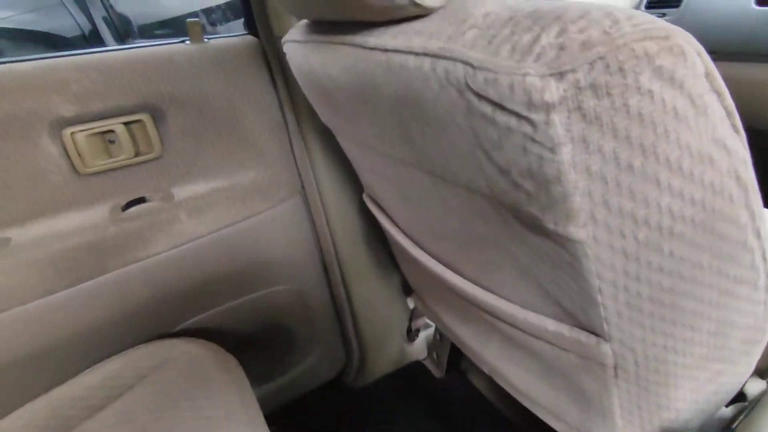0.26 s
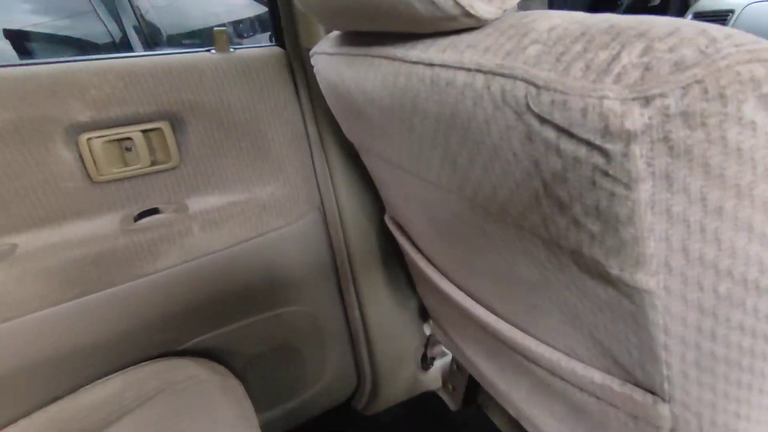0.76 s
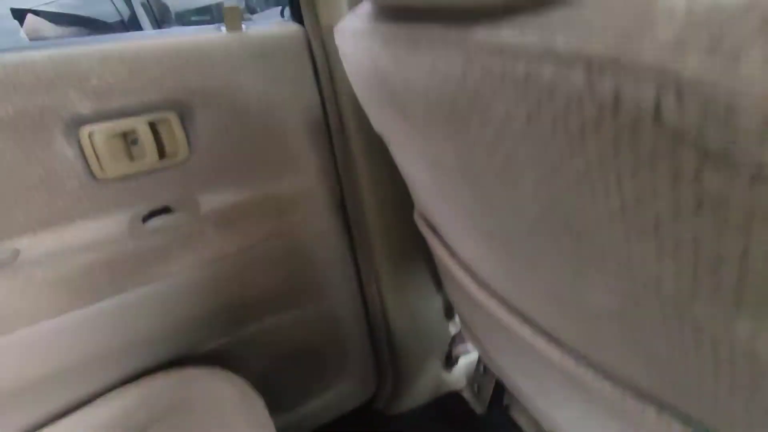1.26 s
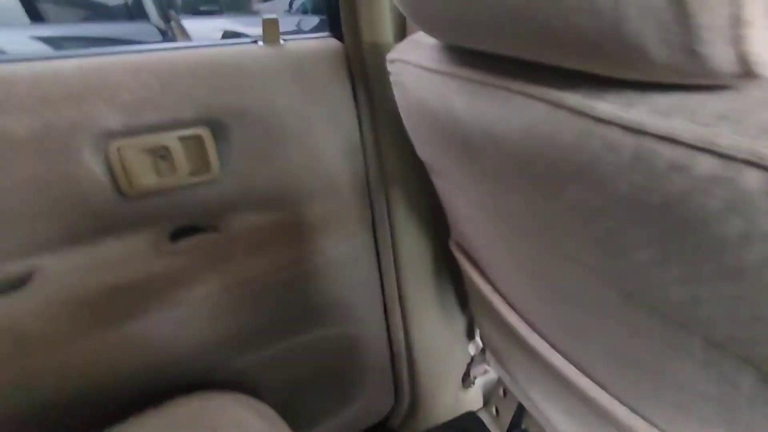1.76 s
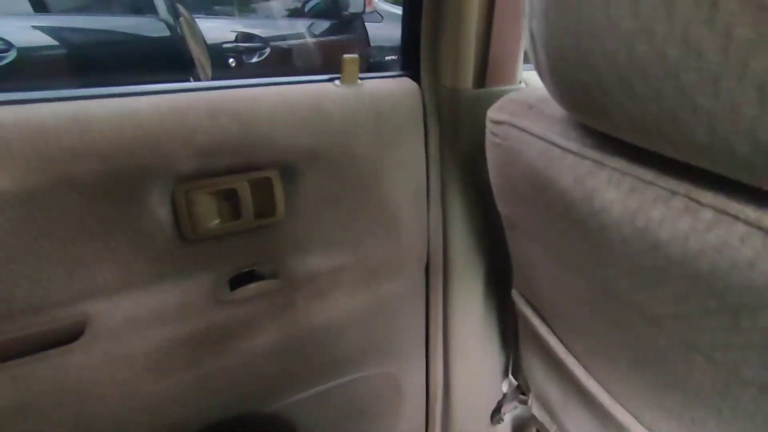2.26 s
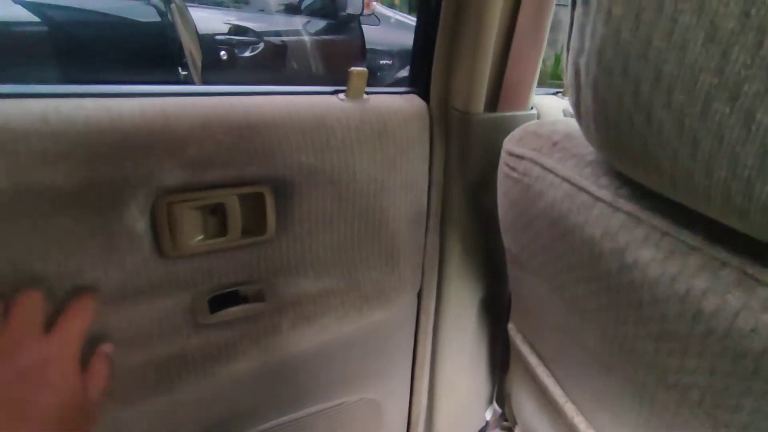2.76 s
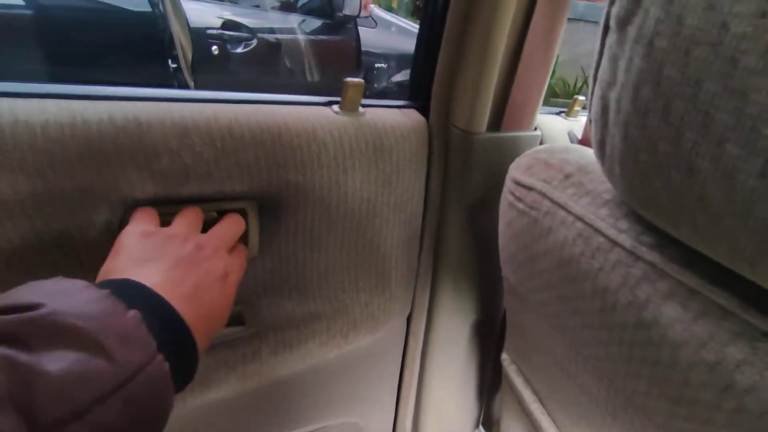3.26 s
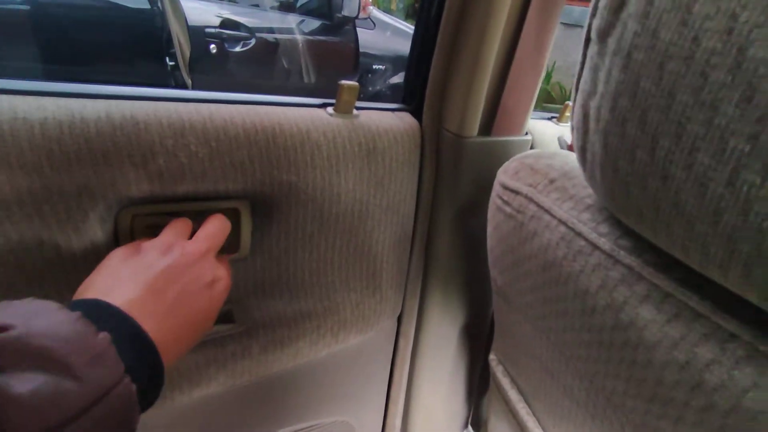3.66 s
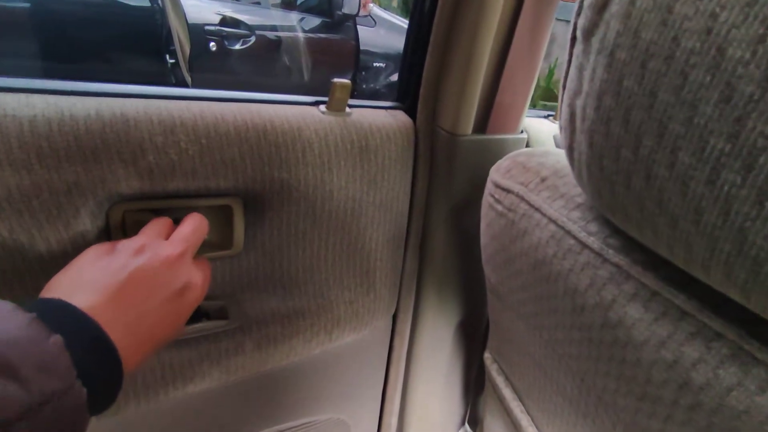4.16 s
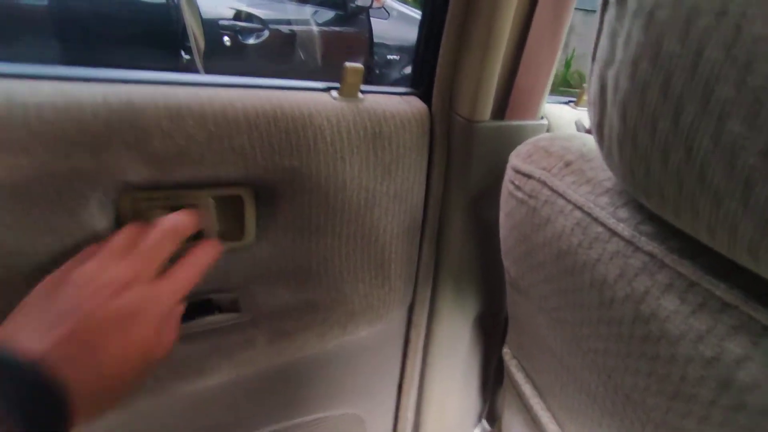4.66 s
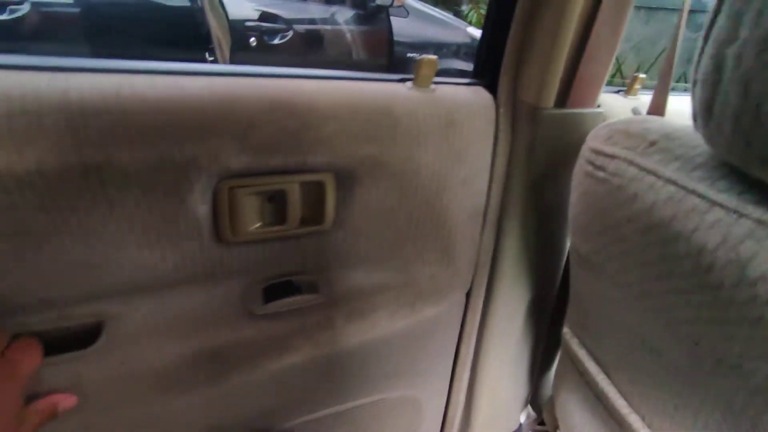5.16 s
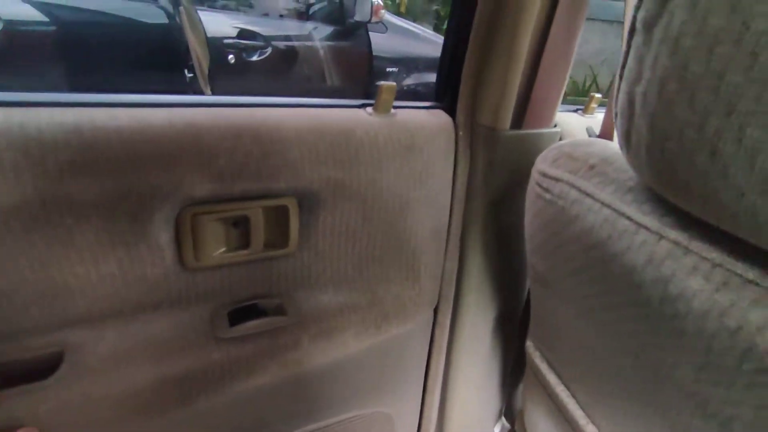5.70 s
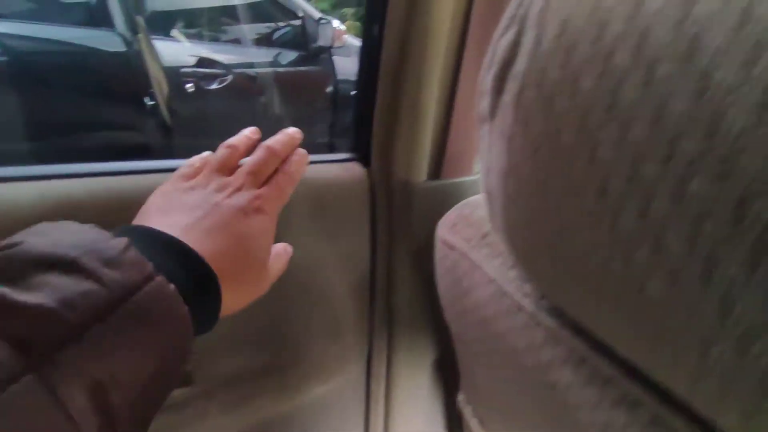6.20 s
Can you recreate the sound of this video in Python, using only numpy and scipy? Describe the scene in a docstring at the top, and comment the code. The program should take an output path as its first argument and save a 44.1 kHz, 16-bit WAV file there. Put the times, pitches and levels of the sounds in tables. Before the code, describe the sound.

The space is a small, padded car cabin, heard close up, with deep uneven rumble, very faint hiss and a low engine hum that emerges after about 1 s and slowly sinks in pitch. At 0.1 s there is a small plastic click and knock amid soft jacket rustle. Dull seat bumps follow; near 1.3 s a hollow tock and slight metal clink, and around 2.0 s a cluster of bright ticks and jingles, then a low bump at 2.3 s. From 3.1 to 4.1 s fingers fiddle with the plastic handle in light, irregular clicks and scrapes. At 4.2 s a sharp click starts a dry creak of about 0.2 s with tiny springy pings; at 4.6 s the lever snaps. Around 5.5 s the door unlatches with a soft, deep thump. At 5.85 s it shuts with the loudest sound, a hard latch clunk and a bassy boom, fading into rumble and slight rustle.

```python
"""A plastic door handle in a parked car is worked: filtered noise bursts click, and stick-slip pulses creak.
Its spring pings in chirps; the door unlatches with a soft thump and is pulled shut with a heavy clunk,
made of decaying noise and shell modes, while single pressure swings and low modes boom in the cabin.
Someone shifts on the back seat: grainy noise rustles, damped modes knock and small metal bits jingle.
Behind it an engine hums as a sum of wandering sine orders, over low rumble and faint hiss."""
import sys
import numpy as np
from scipy import signal
from scipy.fft import rfft, irfft, next_fast_len
from scipy.io import wavfile
from scipy.ndimage import map_coordinates

SR = 44100
rng = np.random.default_rng(int(sys.argv[2]) if len(sys.argv) > 2 else 0)


def persist_wave(psi):
    """Save psi, clipped to +-1, as 16-bit WAV."""
    counts = np.round(np.clip(psi, -1, 1) * 32767).astype(np.int16)
    wavfile.write(sys.argv[1], SR, np.atleast_2d(counts).T)


N = 283871
TIME = np.arange(N) / SR
TOP_HZ = 14600  # upper band limit

# All levels are relative settings: later gains, pans and cabin tail still act on them.
# Plastic handle, trim and latch contacts. Each row: start in seconds, level in dB, click note in Hz,
# clack in dB, knock in dB.
CONTACTS = [(0.0908, -38.5, 2720, -4.5, -18), (0.0942, -33, 2750, -9, 3.5), (0.9423, -45, 3930, -17, -6),
            (1.4096, -45, 3020, -8.5, -15), (1.9548, -44, 3950, -12, -18), (1.9633, -44, 3340, -2, -9),
            (1.9709, -39, 5750, -11.5, -2), (1.9936, -37, 5270, -3, -10), (2.2502, -37, 3340, -12.5, -16),
            (3.1936, -51.5, 3733, -15, 3), (3.229, -51, 3370, -12, 4), (3.2946, -47.5, 2960, -20, -23),
            (3.3003, -36.5, 4600, -13, -10.5), (3.3565, -50.5, 4770, -2, 2), (3.4183, -57.5, 2640, 3.5, 4),
            (3.4825, -44.5, 5250, -10.5, -20), (3.709, -48.5, 3730, -4, -1), (3.785, -53, 4000, -9, 3),
            (3.8336, -49.5, 3800, -7.5, -18), (3.966, -37, 3680, -16, -14), (3.9974, -49, 3810, -0.5, -20),
            (4.0426, -48.5, 3280, 3.5, -4), (4.1718, -58, 3537, -3, -15), (4.2229, -32, 5130, -6, -32),
            (4.2544, -38.5, 4060, -6.5, -29), (4.5165, -45.5, 4160, -8, -6),
            (4.5614, -48.5, 3070, -5.5, -10), (4.6252, -43, 4230, -10.5, -5),
            (4.6379, -30.5, 3270, -12.5, -9), (5.1724, -49, 4080, -9.5, -2), (5.243, -53.5, 4100, -7, -5),
            (5.478, -40.5, 3360, -4.5, -3), (5.612, -54.5, 2760, -6, -6), (5.819, -54, 3630, 1, 11)]
CONTACT_PAN_DB = -2.5  # left minus right
CLACK_COLOUR = [(500, -15), (850, 3.5), (1500, 4.0), (2300, 1.5), (3500, -37.0)]  # each row: Hz, dB
KNOCK_COLOUR = [(150, -11), (300, 3.5), (600, 11.0), (1100, -23.0)]  # each row: Hz, dB
# Faint ticks under a finger stroke: level re its scrape and scatter in dB, note in Hz, clack and knock in dB.
TICK_DB, TICK_SCATTER_DB, TICK_HZ, TICK_CLACK_DB, TICK_KNOCK_DB = -3, 7.5, 3200, 5.5, 9

# Resonances of the door trim. Each row: centre in Hz, width in Hz, level in dB.
TRIM_RESONANCES = [(299, 56, 2.5), (401, 39, 1), (541, 14, 6), (607, 72, 2), (780, 107, -1.5),
                   (1070, 87, -1.5), (1510, 150, -8), (1870, 130, -8.5), (2120, 430, -18)]
# The lever sliding back creaks: start, length, attack and release in seconds, starting level in dB.
CREAK_S, CREAK_LENGTH_S, CREAK_ATTACK_S, CREAK_RELEASE_S, CREAK_DB = 4.225, 0.19, 0.007, 0.015, -46
CREAK_SAG_DB_PER_S = 15  # the creak weakens as the spring relaxes
CREAK_COLOUR = [(300, -24), (700, 8), (1500, -14), (2300, -14), (5000, -32), (12000, -80)]  # each row: Hz, dB

# Fingers working the lever. Each row: start in seconds, length in seconds, scrape level in dB.
STROKES = [(3.191, 0.031, -62), (3.369, .16, -69), (4, 0.11, -56.5), (4.035, 0.021, -60),
           (4.122, 0.026, -58.5), (4.172, .09, -65.5), (4.504, 0.14, -66)]
STROKE_ATTACK_S, STROKE_RELEASE_S = 0.0019, 0.013
SCRAPE_COLOUR = [(200, -4), (400, 9), (850, 5), (1900, 2.0), (3500, -9.0), (6000, -24),
                 (14000, -81)]  # each row: Hz, dB

# Pings of the handle's return spring. Each row: start in seconds, level in dB.
SPRING_PINGS = [(3.4831, -46.5), (4.2243, -38.5), (4.235, -49), (4.2538, -44), (4.2779, -57), (4.302, -55),
                (4.32, -47.5), (4.332, -52), (4.341, -50)]
PING_COLOUR = [(3000, -6), (4200, -24), (5400, 6), (6800, 0), (12000, -32)]  # each row: Hz, dB

# Latch and door blows. Each row: start in seconds, level in dB, 60 dB decay of the rattle in seconds,
# rise constant in seconds.
CLUNKS = [(4.044, -49, 0.09, .001), (4.641, -40, 0.14, 0.00054), (5.46, -42.5, 0.1, 0.0098),
          (5.474, -39.5, 0.21, 0.0074), (5.839, -40.5, 0.13, 0.0039), (5.8469, -27.5, 0.12, 0.00077),
          (5.862, -41, 0.22, 0.0026), (5.877, -48, 0.24, 0.0028), (5.968, -53.5, 0.11, .005)]
# Spectrum of the rattle. Each row: frequency in Hz, level in dB.
RATTLE_COLOUR = [(120, -4), (220, 6), (450, -3.5), (850, -4), (1100, -17), (1450, -8.5), (2000, -17),
                 (2500, -24.5), (4000, -25), (7000, -37), (14000, -65)]
CRACK_COLOUR = [(1000, 2), (1900, -3), (4000, -5.5), (7000, -9.0), (14000, -23)]  # each row: Hz, dB
# Modes of the door shell. Each row: frequency in Hz, level in dB, 60 dB decay in seconds.
DOOR_MODES = [(332, -5, 0.26), (557, -1, 0.25), (773, 4, 0.063), (900, -1, 0.066), (1305, -10, 0.081),
              (1450, 0, 0.076), (1810, -1, 0.099)]

# Air pushed about the cabin. Each row: time of the strongest push in seconds, push in dB,
# half period in seconds, ringing in dB.
THUMPS = [(0.143, -35, 0.018, -53), (1.438, -28.5, 0.012, -45.5), (2.271, -26.5, 0.012, -43),
          (4.025, -32.5, 0.014, -43.5), (4.47, -32.5, 0.0099, -53), (5.19, -27, 0.019, -40),
          (5.508, -12.5, 0.01977, -33.5), (5.868, -11, .017, -22.5), (5.988, -23, 0.017, -32.5)]
# Modes of the cabin. Each row: frequency in Hz, level in dB, 60 dB decay in seconds.
CABIN_MODES = [(26.35, 2, 1.2), (36.5, 2, 1.0), (53.2, -2, 0.77), (85.5, -2.5, 0.59), (96.96, -3, 0.56),
               (121.2, -14, 0.78), (167.9, -14.5, 0.6), (220, -19, 0.44)]
BOOM_COLOUR = [(40, 7), (95, 14.5), (170, 16), (300, -56.0)]  # each row: Hz, dB

# Single-note knocks of seat, trim and door, the lowest from the door blows. Each row: start in seconds,
# level in dB, main note in Hz, left minus right in dB.
NOTE_KNOCKS = [(.0955, -30, 526, 5), (.0975, -35, 880, 8), (.102, -40, 262, -3.5),
               (0.1538, -36.5, 1166, -3), (0.344, -50, 573, 2), (0.371, -49.5, 560, 3),
               (0.648, -46.5, 242, 0), (0.8892, -45.5, 3780, -24), (1.031, -42.5, 277, 3),
               (1.101, -47, 303, 5), (1.1156, -43.5, 3400, -24), (1.309, -34.5, 1152, -1),
               (1.318, -31.5, 1230, -4.5), (2.8374, -44, 148, 2.5), (3.112, -42.5, 153.3, 1.5),
               (3.198, -38, 297, 4), (3.499, -41.5, 145.5, 2.5), (4.044, -34.5, 164.3, 3),
               (4.046, -34, 241, 2), (4.092, -45, 2010, -9), (4.14, -41, 906, -1),
               (4.41, -40.5, 2070, -2.5), (4.516, -36, 149.4, 1.5), (4.567, -45, 1850, 3),
               (4.645, -46, 398, 4), (5.18, -45, 225, 3), (5.456, -45.5, 1810, -2), (5.474, -36, 2050, -4),
               (5.481, -35, 222, 0), (5.505, -29, 164, 1.5), (5.765, -34, 111.4, 0), (5.774, -38, 220, 3.5),
               (5.853, -23, 94.9, 2.5), (5.857, -33.5, 173.4, 2)]
# Decay at the reference note; power of pitch by which higher notes die sooner.
NOTE_T60_S, NOTE_REF_HZ, NOTE_DAMPING = .15, 297, 1.28

# Small metal bits touching. Each row: start in seconds, level in dB, brightness in dB per octave,
# left minus right in dB.
JINGLES = [(0.668, -50, 4, 11), (1.308, -40, -4.5, 12), (1.318, -41.5, -24, -2), (1.99, -36, 19, 6),
           (1.9982, -36, -7, 3), (2.0275, -36.5, 9, 7), (2.103, -43.5, -8, 3)]
# Modes of the metal bits. Each row: mean frequency in Hz, level in dB before brightness, 60 dB decay in seconds.
METAL_MODES = [(4040, -19, 0.089), (5220, -10, 0.087), (5700, -12, 0.05), (8480, -2, 0.069),
               (8230, -11, 0.075), (11980, 1.5, 0.058), (12900, -4, 0.092), (13000, -16, .04),
               (13700, -11, 0.035)]

# The passenger's movements. Each row: time of the height in seconds, rustle in dB, dull stir of the seat in dB,
# build-up in seconds, settling in seconds.
MOVES = [(.1, -60, -61.5, 0.43, 0.19), (.58, -63.5, -72, 0.14, 0.14), (1.0, -65.5, -60, .18, 0.2),
         (1.27, -59.5, -59.5, 0.26, 0.3), (1.85, -62, -60.5, 0.4, 0.21), (2.41, -63.5, -66, 0.2, 0.18),
         (3.1, -67.5, -69.5, 0.41, 0.18), (4.76, -70, -68, 0.038, 0.36), (5.15, -69, -65, 0.13, 0.15),
         (5.8, -72, -63.5, 0.36, 0.16), (6.25, -66.5, -66, 0.16, 0.12)]
STILL_DB = -73.5  # what is left of rustle and stir between movements
# Spectrum of rubbing cloth. Each row: frequency in Hz, level in dB.
CLOTH_COLOUR = [(290, -33.5), (500, -3), (731, -1.5), (878, -1.5), (1500, -2), (2070, -5), (3260, -6.5),
                (6870, -15.5), (13700, -22.5), (14500, -19)]

# The hand leans on the door trim, heard as a dull stir.
GRIP_S, GRIP_LENGTH_S, GRIP_EDGE_S, GRIP_DB = 3.12, 1.61, 0.041, -63
STIR_COLOUR = [(90, -12), (150, -1), (300, -2.5), (550, -8.5), (1000, -42)]  # each row: Hz, dB
# The car body rocks with the seat: mean level in dB, growth in dB per dB of stir.
RUMBLE_DB, RUMBLE_GROWTH = -48.5, 0.31
RUMBLE_COLOUR = [(10, -3.5), (26, 17.0), (45, 4), (65, 0.5), (90, -2.5), (140, -13), (175, -15.5),
                 (230, -65)]  # each row: Hz, dB

# Engine hum, slowing overall. Each row: time in seconds, firing rate in Hz, level in dB.
ENGINE = [(.5, 55, -69), (1.2, 55.5, -59), (2.9, 52, -49), (3.45, 51.6, -49), (3.8, 50.2, -55),
          (4.35, 47.5, -49), (4.8, 48.9, -48), (5.45, 46.6, -52), (5.7, 46.57, -57)]
ENGINE_WOBBLE = 0.0237  # share by which the firing rate wanders
SECOND_DB = -6.5  # second order re the first
# Further, weaker engine orders, two of them half orders. Each row: order as a multiple of the firing rate,
# level in dB re the first order.
WEAKER_ORDERS = [(1.5, -14.5), (2.5, -9), (3, -19.5)]
BOOM_HZ, BOOM_WIDTH_HZ, BOOM_DB = 94.26, 5.2, 10.5  # cabin resonance that lifts nearby engine lines
# Spectrum of the faint hiss. Each row: frequency in Hz, level in dB.
AIR_COLOUR = [(120, -48), (200, -24), (244, -10.5), (271, -10), (402, -9), (597, -4), (986, -7.5),
              (1410, -19), (2130, -46.5), (13700, -32.5), (14500, -57)]


def amp(db):
    """Decibels to gain."""
    return 10 ** (np.asarray(db) / 20)


def unit(x):
    """Scaled to rms 1."""
    return x / np.sqrt(np.mean(x ** 2) + 1e-20)


def crest(x):
    """Scaled to peak 1."""
    return x / np.abs(x).max()


def wobble(rate):
    """A smooth random curve with rate knots a second."""
    return map_coordinates(rng.standard_normal(int(N * rate / SR) + 4), [TIME * rate])


def filtered(x, response):
    """Linear filtering: the spectrum times a complex response of frequency."""
    n = x.shape[-1]
    m = next_fast_len(n + 8192)
    return irfft(rfft(x, m) * response(np.fft.rfftfreq(m, 1 / SR)), m)[..., :n]


def colour(x, points):
    """Spectral shaping by (Hz, dB) points on a log frequency axis, at rms 1."""
    f, db = np.transpose(points)
    return unit(filtered(x, lambda hz: amp(np.interp(np.log(hz + 1), np.log(f), db))))


def fade(t, t60):
    """Exponential decay, 60 dB in t60 seconds."""
    return np.exp(-np.log(1000) * t / t60)


def rise(t, seconds):
    """Exponential onset with the given time constant."""
    return 1 - np.exp(-t / seconds)


def held(start, length, attack, release):
    """Envelope that rises at start, holds for length, then dies away."""
    t = np.maximum(TIME - start, 0)
    return rise(t, attack) * np.exp(-np.maximum(t - length, 0) / release)


def ring(modes, t, scatter_db):
    """Modal superposition: damped sines (Hz, dB, t60), excited at new strengths for each blow."""
    return sum(amp(db + scatter_db * rng.standard_normal()) * fade(t, t60) * np.sin(2 * np.pi * hz * t)
               for hz, db, t60 in modes)


def pair(size, apart):
    """Partly coherent stereo noise: a shared part and an opposed one."""
    mid, side = rng.standard_normal((2, size))
    return np.array([mid + apart * side, mid - apart * side])


def pan(db):
    """Level difference: channel gains whose ratio, left over right, is db."""
    return amp([[db / 2], [-db / 2]])


def add(track, s, sound, pan_db):
    """Superposition: mix a sound into a stereo track at time s."""
    part = track[:, round(s * SR):][:, :sound.shape[-1]]
    part += (pan(pan_db) * sound)[:, :part.shape[1]]


def contacts():
    """Impact: each contact is a short click with its own note, a plastic clack and a longer knock of the trim."""
    out, t = np.zeros((2, N)), TIME[:SR // 8]
    for s, db, hz, clack_db, knock_db in CONTACTS + stray_ticks(count=3):
        hard_db = .5 * (db + 28.0)  # firmer contacts are brighter
        snap_colour = [(1500, -38), (2800, -1.5), (4300, -5), (6500, hard_db / 2 - 5.5),
                       (10000, hard_db - 15), (14000, hard_db - 21)]
        note_colour = [(hz / 1.95, -30), (hz, 0), (hz * 2.02, -22), (hz * 3, -40)]
        snap = colour(pair(len(t), 0.99), snap_colour) * fade(t, 0.015)
        note = colour(pair(len(t), 0.62), note_colour) * (fade(t, 0.017) + amp(-10.5) * fade(t, 0.1))
        clack = colour(pair(len(t), 0.56), CLACK_COLOUR) * fade(t, 0.064)
        knock = colour(pair(len(t), 0.26), KNOCK_COLOUR) * fade(t, 0.072)
        blow = amp(-6) * snap + amp(-12.5) * note + amp(clack_db) * clack + amp(knock_db - 5.5) * knock
        add(out, s, amp(db) * blow * rise(t, 0.00011), CONTACT_PAN_DB)
    return out


def stray_ticks(count):
    """Chance contact: a few faint ticks at random moments of each finger stroke."""
    return [(s + length * rng.random(), db + TICK_DB + TICK_SCATTER_DB * rng.standard_normal(),
             TICK_HZ, TICK_CLACK_DB, TICK_KNOCK_DB)
            for s, length, db in STROKES for _ in range(count)]


def trim_response(hz):
    """Resonance: second-order bands of the door trim, summed with alternating sign."""
    return sum((-1) ** k * amp(db) * 1j * hz * width / (centre ** 2 - hz * hz + 1j * hz * width)
               for k, (centre, width, db) in enumerate(TRIM_RESONANCES))


def creak():
    """Stick-slip friction: the lever slips about 210 times a second, each slip ticking and shaking the trim."""
    rate = 210 * np.exp(.09 * wobble(90))
    pulses = np.diff(np.floor(np.cumsum(rate) / SR), prepend=0)  # one per completed cycle
    slips = pulses * amp(4.9 * rng.standard_normal(N))
    scrape = unit(slips) + amp(-17) * rng.standard_normal((2, N))
    shaken_trim = unit(filtered(scrape, trim_response))
    ticks = colour(slips, CREAK_COLOUR)
    level = amp(CREAK_DB - CREAK_SAG_DB_PER_S * np.maximum(TIME - CREAK_S, 0))
    sliding = held(CREAK_S, CREAK_LENGTH_S, CREAK_ATTACK_S, CREAK_RELEASE_S)
    return (shaken_trim + amp(-6.5) * ticks) * level * sliding * pan(-2)


def fingers():
    """Sliding friction: skin and nails drag over grained plastic in tiny catches."""
    pressure = sum(amp(db) * held(s, length, STROKE_ATTACK_S, STROKE_RELEASE_S) for s, length, db in STROKES)
    catches = pair(N, 0.93) * amp(4.6 * wobble(350) + 1.9 * wobble(70))
    return colour(catches, SCRAPE_COLOUR) * pressure * pan(-3)


def spring():
    """Elastic release: each slip of the coil is a tiny rising chirp with a faint ring."""
    out, t = np.zeros((2, N)), TIME[:SR // 20]
    for s, db in SPRING_PINGS:
        hz = 4000 + 2000 * rise(t, .0028)
        chirp = np.sin(2 * np.pi * np.cumsum(hz) / SR) * t * np.exp(-t / .0012)
        tail = colour(rng.standard_normal(len(t)), PING_COLOUR) * fade(t, 0.033)
        add(out, s, amp(db) * (crest(chirp) + amp(-15) * tail), -6.5)
    return out


def clunks():
    """Collision of latch and striker: a short crack, a duller rattle, and the door shell rings."""
    out, t = np.zeros((2, N)), TIME[:SR // 3]
    for s, db, t60, rise_s in CLUNKS:
        crack = colour(pair(len(t), 1.0), CRACK_COLOUR) * fade(t, t60 / 2)
        rattle = colour(pair(len(t), 0.67), RATTLE_COLOUR) * fade(t, t60)
        shell = crest(ring(DOOR_MODES, t, scatter_db=6.5))
        blow = amp(-13) * crack + amp(-1.0) * rattle + amp(0.5) * shell
        add(out, s, amp(db) * blow * rise(t, rise_s), -1.5)
    return out


def thumps():
    """Compression: a moving door or body squeezes the cabin air once; cabin and panels boom on."""
    out, t = np.zeros((2, N)), TIME[:SR]
    for s, db, half, ring_db in THUMPS:
        u = np.sqrt(3) * (TIME - s) / half
        out -= amp(db) * (1 - u * u) * np.exp(-u * u / 2)
        panels = colour(pair(SR, 0.17), BOOM_COLOUR) * fade(t, 0.36)
        boom = ring(CABIN_MODES, t, scatter_db=2.5) + amp(-7.5) * panels
        add(out, s - half, amp(ring_db) * boom * rise(t, 0.0036), 0)
    return out


def note_knocks():
    """Damped resonance: contacts ring one note with weaker neighbours, from low thuds to short high ticks."""
    out, t = np.zeros((2, N)), TIME[:SR // 2]
    for s, db, hz, pan_db in NOTE_KNOCKS:
        t60 = NOTE_T60_S * (NOTE_REF_HZ / hz) ** NOTE_DAMPING
        modes = [(hz, 0, t60), (hz * 1.12, -7, t60 / 2), (hz * 1.45, -11, t60 / 2)]
        add(out, s, amp(db) * crest(ring(modes, t, scatter_db=1.0)), pan_db)
    return out


def jingles():
    """Modal ringing of a zip pull or keys: a bright tick and a few high modes, brightness varying by touch."""
    out, t = np.zeros((2, N)), TIME[:SR // 4]
    for s, db, bright_db, pan_db in JINGLES:
        tick_colour = [(1500, -11.5 - bright_db), (6000, 0), (14000, bright_db - 7.5)]
        tick = colour(pair(len(t), 1.0), tick_colour) * fade(t, 0.042)
        struck = [(hz * (1 + 0.0083 * rng.standard_normal()), level + bright_db * np.log2(hz / 8000), t60)
                  for hz, level, t60 in METAL_MODES]
        modes = np.array([crest(ring(struck, t, scatter_db=1.5)) for _ in range(2)])
        add(out, s, amp(db) * (amp(-3.0) * modes + amp(-5) * tick) * rise(t, 0.00087), pan_db)
    return out


def movement():
    """Power addition: rustle and seat levels in dB, each move building up and settling like a bell curve."""
    power = sum(amp([[rustle_db], [seat_db]]) ** 2
                * np.exp(-((TIME - s) / np.where(TIME < s, build, settle)) ** 2)
                for s, rustle_db, seat_db, build, settle in MOVES)
    return 10 * np.log10(power + amp(STILL_DB) ** 2)


def rustle():
    """Fibre friction: a jacket brushes the seat, its hiss made grainy by catching fibres."""
    level_db, _ = movement()
    fibres = pair(N, 1.0) * amp(1.4 * wobble(1500))
    return colour(fibres, CLOTH_COLOUR) * amp(level_db + 1.5 + 1.37 * wobble(25))


def seat_stir():
    """Damped contact noise: the seat stirs with the passenger, the trim under the hand."""
    _, seat_db = movement()
    grip = amp(GRIP_DB) * held(GRIP_S, GRIP_LENGTH_S, GRIP_EDGE_S, GRIP_EDGE_S)
    level = np.hypot(amp(seat_db), grip)
    return colour(pair(N, 0.24), STIR_COLOUR) * level * amp(3.75 * wobble(21.93))


def rumble():
    """Low-frequency rocking: the car body rumbles more as the seat stirs."""
    _, seat_db = movement()
    level_db = RUMBLE_DB + RUMBLE_GROWTH * (seat_db - seat_db.mean())
    return colour(pair(N, 0.21), RUMBLE_COLOUR) * amp(level_db + 2.8 * wobble(8.1))


def engine():
    """Periodic excitation: low engine orders, lifted where they near the cabin resonance."""
    s, rates, levels = np.transpose(ENGINE)
    hz, level_db = np.interp(TIME, s, rates), np.interp(TIME, s, levels)
    phase = 2 * np.pi * np.cumsum(hz * (1 + ENGINE_WOBBLE * wobble(14))) / SR
    hum = 0
    for k, db in [(1, 0), (2, SECOND_DB)] + WEAKER_ORDERS:
        lift_db = BOOM_DB / (1 + (2 * (k * hz - BOOM_HZ) / BOOM_WIDTH_HZ) ** 2)
        hum = hum + amp(level_db + db + lift_db + 3.2 * wobble(12)) * np.sin(k * phase)
    return amp(3.0) * hum


def hiss():
    """Stationary noise: a faint, steady coloured hiss."""
    return amp(-73) * colour(pair(N, 1.0), AIR_COLOUR)


def cabin(x, lead_s, wet_db, t60):
    """Arrival difference and reflection: the left channel leads; glass and trim add a very short tail."""
    direct = filtered(x, lambda hz: np.exp(1j * np.pi * hz * lead_s * np.array([[1], [-1]])))
    t = TIME[:SR // 6]
    echoes = pair(len(t), 0.41) * fade(t, t60) * rise(t, 0.0021)
    tail = colour(echoes, [(200, -31.5), (700, 5), (4000, 9.5), (14000, -6.0)])
    tail = tail / np.linalg.norm(tail[0])
    return direct + amp(wet_db) * signal.fftconvolve(x, tail, axes=1)[:, :N]


def scene():
    """Superposition of all sources; the pressure swings of the thumps are alike in both channels."""
    handle = contacts() + creak() + fingers() + spring()
    door = cabin(handle + clunks(), lead_s=0.00025, wet_db=-10.5, t60=0.055)
    knocks = cabin(note_knocks(), lead_s=0.000088, wet_db=-8.5, t60=0.031)
    stirring = jingles() + rustle() + seat_stir()
    return door * pan(-.8) + thumps() + knocks + stirring + rumble() + engine() + hiss()


def record(dry):
    """Band limitation: nothing from TOP_HZ upwards passes."""
    return filtered(dry, lambda hz: hz < TOP_HZ)


dry = scene()
out = record(dry)
persist_wave(out)
```